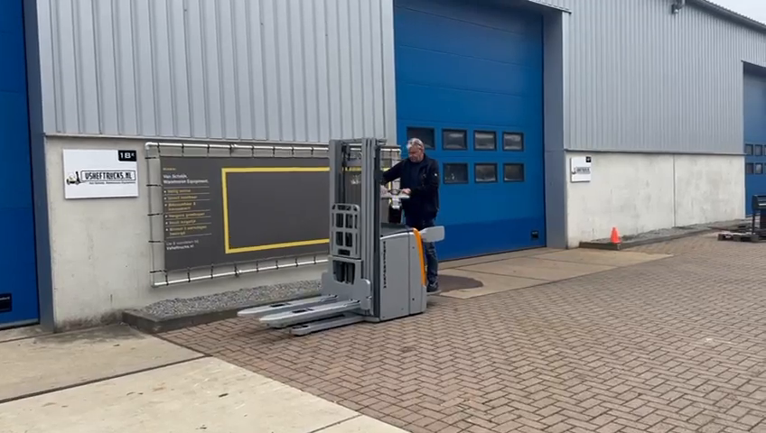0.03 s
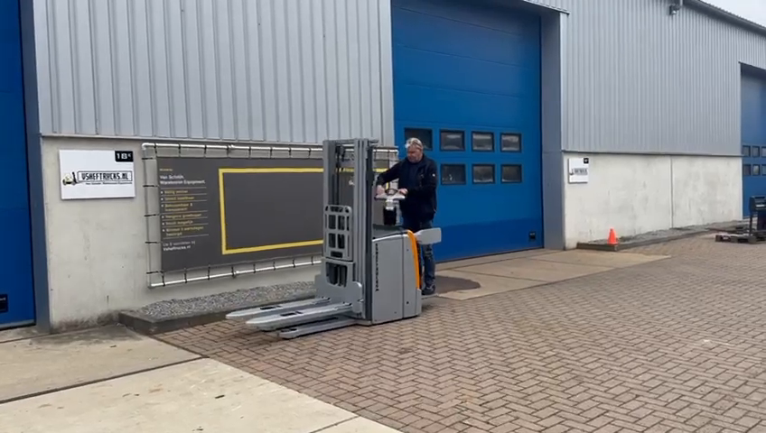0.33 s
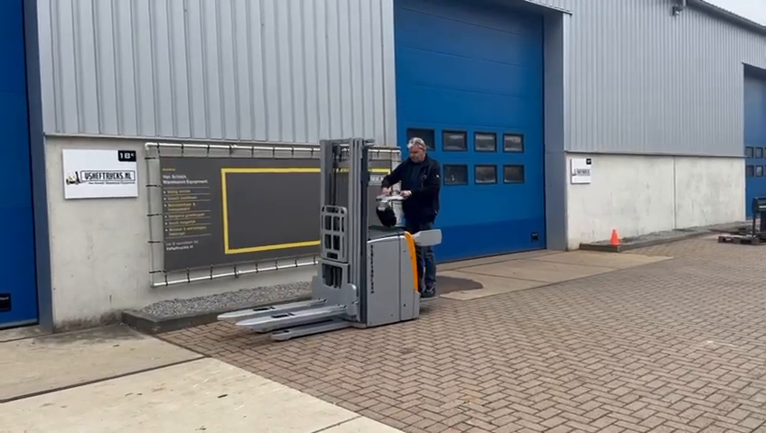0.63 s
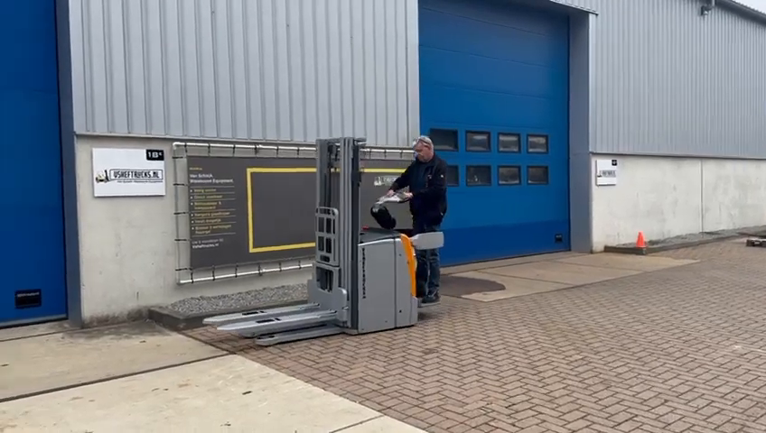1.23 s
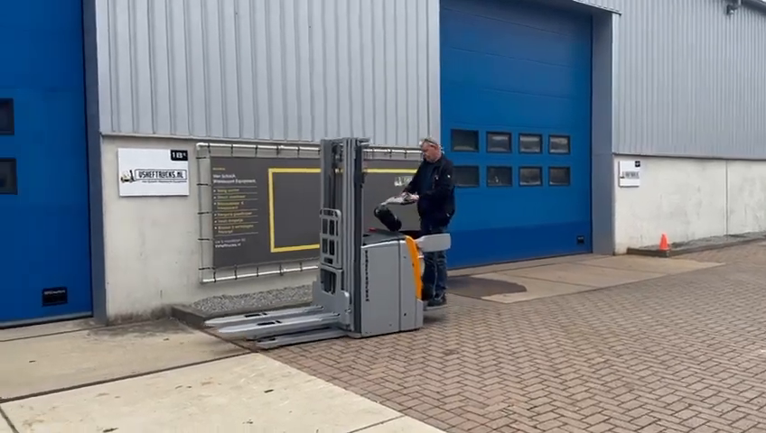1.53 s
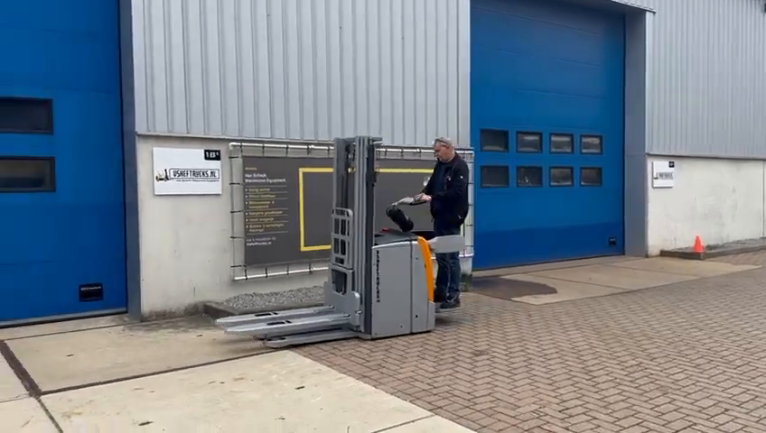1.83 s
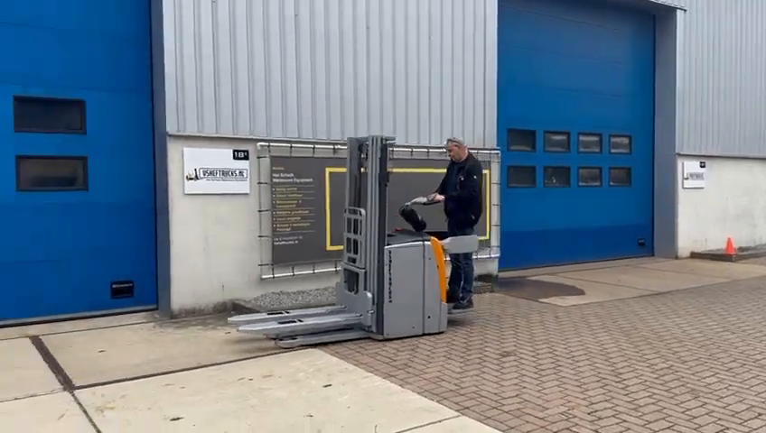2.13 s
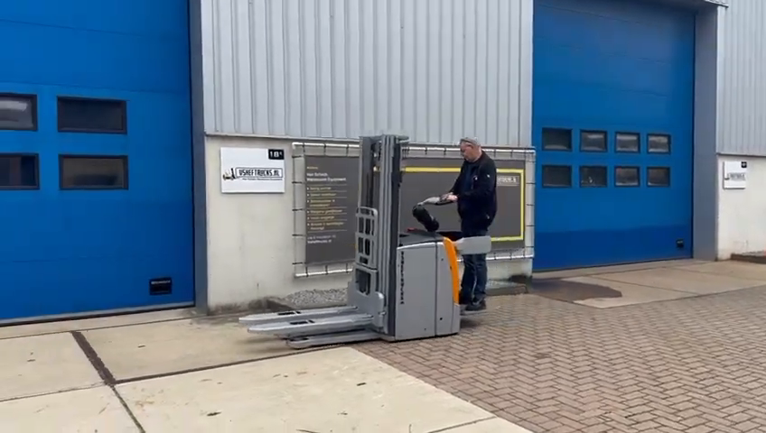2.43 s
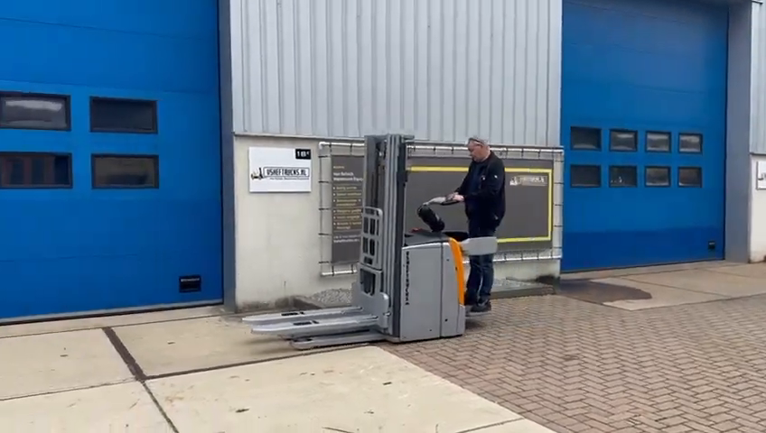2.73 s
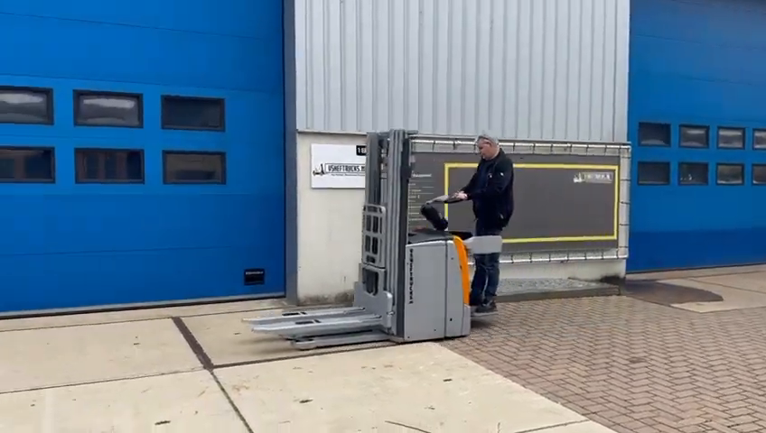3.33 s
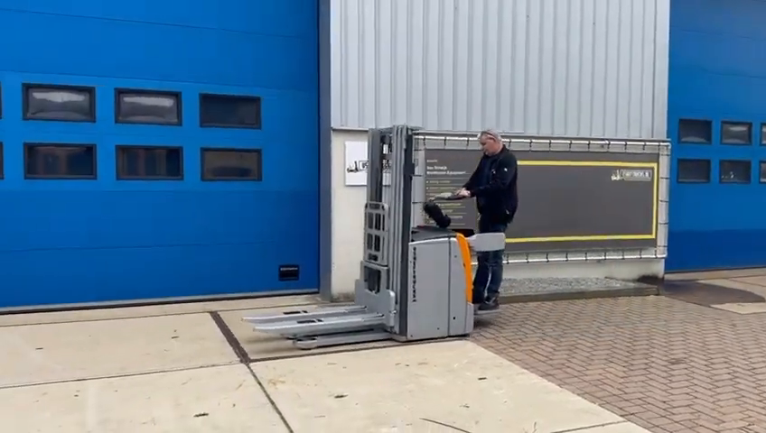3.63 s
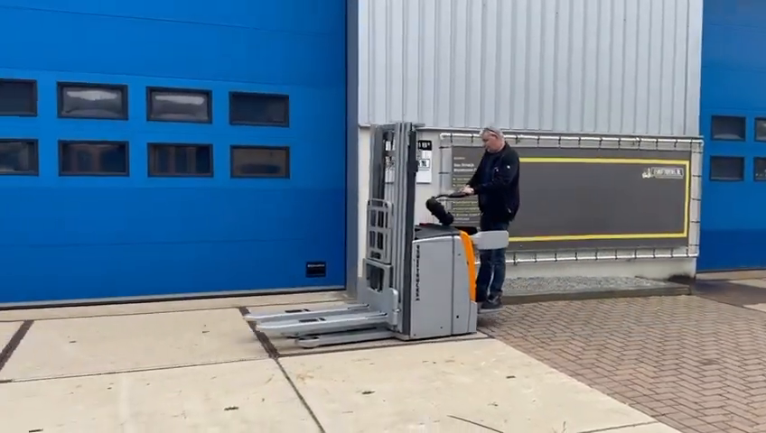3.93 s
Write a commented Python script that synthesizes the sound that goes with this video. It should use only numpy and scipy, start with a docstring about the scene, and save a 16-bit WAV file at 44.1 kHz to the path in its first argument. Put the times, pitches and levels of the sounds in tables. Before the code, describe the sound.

Metal clatter and booming jolts from an electric pallet stacker rolling across bumpy paving.

```python
"""An electric pallet stacker drives over brick paving onto concrete slabs, in front of a steel-clad hall.
At first wind buffets the microphone and the stacker pulls away with a faint squeak. Its rolling noise
grows over a faint drive hum, and each joint jolts it: frame and forks boom, loose mast parts clatter,
and grit crunches under the hard wheels. Near 2 s a run of hard jolts sets the battery cover clanking;
near 3.6 s comes another, as the heavy drive wheel thuds onto a slab."""
import sys
import numpy as np
from scipy import signal
from scipy.fft import rfft, irfft, next_fast_len
from scipy.io import wavfile
from scipy.ndimage import uniform_filter1d

SR = 44100
rng = np.random.default_rng(int(sys.argv[2]) if len(sys.argv) > 2 else 0)


def transcribe(u):
    """Save the signal u as a 16-bit wav file named by the first command-line argument.

    u: samples, shape (n,) or (channels, n), limited to [-1, 1]; the rate is SR.
    q: integer samples, one column per channel.
    """
    v = np.clip(np.atleast_2d(u).T, -1, 1)
    q = np.round(v * 32767).astype(np.int16)
    wavfile.write(sys.argv[1], SR, q)


N = 176400
TIME = np.arange(N) / SR
FFT_SIZE = 2 * next_fast_len((N + SR) // 2)
FREQS = np.maximum(np.arange(FFT_SIZE // 2 + 1) * SR / FFT_SIZE, 1)

# Levels are relative within each table.
# gusts on the microphone: (time [s], level [dB], time constant [s])
GUSTS = [(0, -31.5, 0.14), (.164, -32.5, 0.11), (.27, -28.5, 0.083), (0.468, -24, 0.1),
         (.518, -21.5, 0.033), (.616, -28.5, 0.068), (.78, -37.5, 0.11)]
# spectra of the broadband sources: (frequency [Hz], level [dB])
AIR_SPECTRUM = [(30, 3.5), (200, -5), (600, -8), (1500, -21.5), (4000, -25.5), (7000, -28.5), (11000, -48)]
BUFFET_SPECTRUM = [(20, -15.5), (42, -8.5), (65, 4), (90, -2.5), (140, -13), (220, -22.5), (400, -43.5),
                   (1000, -78)]
TYRE_SPECTRUM = [(25, -47.5), (60, 8.5), (130, 4), (250, 4), (400, -2), (600, -3), (1000, -11), (2000, -11),
                 (4000, -25.5), (7000, -31), (11000, -36.5)]
GRIT_SPECTRUM = [(600, -15), (2000, -1.5), (4000, 6.5), (7000, 2), (8300, 9.5), (9700, 5), (10700, -0.5),
                 (12000, -40)]
CLATTER_SPECTRUM = [(300, -40), (700, 4), (1000, 1), (1900, -3), (2500, -7), (3600, -8), (5200, -19),
                    (7000, -22), (10000, -19.5), (12000, -37)]
PANEL_SPECTRUM = [(25, -46.5), (60, -24), (130, -3.5), (260, 1.5), (400, -6), (560, 1.5), (730, -2.5),
                  (950, -18), (1500, -19.5), (4000, -58.5)]
# partials of the drive hum: (frequency [Hz], level [dB])
HUM_PARTIALS = [(259, -51), (522, -58), (732, -69.5)]
# course of the rolling noise: (time [s], level [dB])
ROLLING_LEVELS = [(0, -54), (.5, -54.5), (.8, -42.5), (1.15, -36.5), (1.32, -45.5), (1.6, -35.5),
                  (2.2, -39.5), (2.5, -39), (2.85, -40.5), (3.4, -34.5), (4, -37)]
# grit crushed under a wheel: (time [s], level [dB], time constant [s])
GRIT_BURSTS = [(0.563, -52, .013), (1.062, -41, .024), (1.513, -46, 0.044), (1.751, -36.5, 0.019),
               (1.901, -21.5, 0.023), (2.045, -32.5, .05), (3.622, -29.5, 0.12)]
# a loose steel pin strikes in the mast: (time [s], level [dB])
PIN_HITS = [(0.424, -51.5), (.787, -45), (.997, -39), (2.713, -37)]
# the battery cover is struck: (time [s], level [dB], pitch [Hz])
COVER_HITS = [(1.835, -16.5, 659), (1.931, -15, 658), (2.033, -16, 658), (2.938, -21.5, 614),
              (3.639, -10.5, 608), (3.682, -11, 539)]
# modes of pin and cover: (ratio to the pitch [1], level [dB], time constant [s])
PIN_MODES = [(1, 0, 0.01)]
COVER_MODES = [(1, -2, 0.0092), (1.27, -12, 0.0084)]
# booms of the forks at the hardest jolts: (time [s], level [dB], time constant [s])
FORK_BOOMS = [(1.832, -16, 0.029), (2.066, -21.5, 0.037), (3.672, -23.5, 0.06)]
# a wheel drops into a joint: (time [s], mast level [dB], frame level [dB], rattle time constant [s])
JOLTS = [(.262, -60, -71, 0.027), (0.312, -48.5, -60, 0.013), (0.42, -51.5, -34, 0.0056),
         (0.544, -45, -35, 0.021), (0.665, -43.5, -35.5, 0.016), (0.786, -47, -32.5, 0.011),
         (0.874, -35.5, -30.5, 0.017), (0.985, -36.5, -28.5, 0.042), (1.059, -37, -28.5, 0.095),
         (1.102, -34, -28, 0.035), (1.186, -40, -32, 0.011), (1.367, -41.5, -34, 0.19),
         (1.414, -33, -23.5, 0.18), (1.475, -30.5, -28.5, 0.079), (1.514, -26, -20.5, 0.025),
         (1.59, -32, -26, 0.2), (1.645, -31.5, -32.5, 0.043), (1.76, -34, -43, 0.075),
         (1.81, -21.5, -18, 0.068), (1.828, -19.5, -18.5, 0.02), (1.869, -22.5, -20, 0.039),
         (1.913, -21, -18, 0.016), (1.932, -22.5, -21, 0.006), (2.027, -18, -16.5, 0.042),
         (2.069, -20.5, -17, 0.074), (2.109, -37, -20.5, 0.07), (2.177, -31, -26, 0.014),
         (2.251, -31.5, -24.5, 0.025), (2.366, -40.5, -25, 0.021), (2.394, -34, -27.5, 0.019),
         (2.503, -45, -45, 0.017), (2.56, -35.5, -28, 0.02), (2.634, -39, -33.5, 0.018),
         (2.709, -36, -28.5, 0.02), (2.859, -39.5, -35, 0.015), (2.924, -35, -31, 0.01),
         (2.939, -31, -24.5, 0.043), (2.983, -32, -25.5, 0.039), (3.018, -31.5, -24.5, 0.056),
         (3.054, -26.5, -20.5, 0.045), (3.108, -33.5, -31, 0.019), (3.169, -39, -46, 0.0098),
         (3.275, -34.5, -27, 0.052), (3.351, -37, -31.5, 0.051), (3.401, -29.5, -23.5, 0.058),
         (3.516, -33, -25.5, 0.03), (3.574, -32, -24.5, 0.1), (3.619, -19, -19.5, 0.058),
         (3.640, -17.5, -15, 0.038), (3.672, -22, -15.5, 0.065), (3.727, -19, -18.5, 0.04),
         (3.758, -24, -17.5, 0.075), (3.835, -25, -20, 0.028), (3.949, -42, -35, 0.015)]
# modes of the mast and of the frame with its forks: (frequency [Hz], level [dB], T60 [s])
MAST_MODES = [(1117, 3, 0.47), (1601, 2, .19), (1891, 8, 0.042), (2100, 2, 0.12), (3284, -3.5, 0.23),
              (4355, -4, .05)]
FRAME_MODES = [(126.9, -6.5, 0.4), (177.6, -17, 0.61), (195.2, -4, 0.65), (232.3, -7.5, 0.38),
               (261.2, -3, 0.17), (456, -6, 0.19), (509, -1.5, 0.24), (541.8, 2, 0.24), (581, -0.5, 0.073),
               (675.5, 1, 0.034), (707.6, 2, 0.086), (742, -2.5, 0.088), (906, -18, 0.22),
               (1003, -9.5, 0.032)]
# reflections off the hall: (delay [s], level [dB])
HALL_ECHOES = [(.019, -19.5), (.034, -16)]
# stereo width: (frequency [Hz], gain of the side signal [dB])
SIDE_GAINS = [(60, -21.5), (200, -24.5), (600, -16), (1100, -13), (2200, -6.5), (4000, -8), (6300, -7),
              (8100, -38), (9500, -12)]
# phase between the microphone ports: (frequency [Hz], phase [rad])
PORT_PHASE = [(30, 0), (1500, 0), (2150, .3), (2580, .7), (3450, .1), (4480, .5), (5700, 0), (6850, .2),
              (7450, 2.2), (8100, 3.1), (8750, 2.7), (9300, .3), (11500, 0)]


def from_db(db):
    """Amplitude ratio of a level in decibels."""
    return 10 ** (np.asarray(db) / 20)


def unit_rms(x):
    """Normalisation to a mean power of 1."""
    return x / np.sqrt(np.mean(x ** 2) + 1e-20)


def over_hz(points):
    """Interpolation of a table on a log-frequency axis."""
    hz, value = np.transpose(points)
    return np.interp(np.log(FREQS), np.log(hz), value)


def colour(x, spectrum):
    """Minimum-phase filtering by the folded cepstrum; white input keeps its power."""
    cepstrum = irfft(np.log(unit_rms(from_db(over_hz(spectrum)))), FFT_SIZE)
    cepstrum[1:FFT_SIZE // 2] *= 2
    cepstrum[FFT_SIZE // 2 + 1:] = 0
    return irfft(rfft(x, FFT_SIZE) * np.exp(rfft(cepstrum)), FFT_SIZE)[:N]


def drift(per_s):
    """Random modulation of unit rms, interpolated between per_s values a second."""
    knots = rng.standard_normal(2000)
    return unit_rms(np.interp(TIME * per_s, np.arange(len(knots)), knots))


def tone(hz):
    """A sinusoid whose phase is the integral of its frequency."""
    return np.sin(2 * np.pi * np.cumsum(hz) / SR)


def contacts(per_s, spread_db):
    """Shot noise: random impulses of uneven size, held near a mean power of 1."""
    sizes = from_db(spread_db * np.minimum(rng.exponential(1, N), 4)) * rng.choice([-1, 1], N)
    clicks = sizes * (rng.random(N) < per_s / SR)
    return clicks / np.sqrt(np.abs(uniform_filter1d(clicks ** 2, size=400)) + 1e-4)


def envelope(age, rise_s, hold_s, decay_s):
    """Linear rise, hold, then the exponential decay of a damped vibration."""
    return np.minimum(age / rise_s, 1) * np.exp(-np.maximum(age - rise_s - hold_s, 0) / decay_s)


def bursts(events, rise_s, hold_s):
    """Incoherent addition: the envelopes of overlapping events sum in power."""
    power = np.zeros(N)
    for start, db, decay_s in events:
        first = int(start * SR)
        age = TIME[:min(N - first, SR // 2)]
        power[first:first + len(age)] += (from_db(db) * envelope(age, rise_s, hold_s, decay_s)) ** 2
    return np.sqrt(power)


def ring(force, modes):
    """Modal superposition: each mode answers the force as a damped resonator."""
    out = 0
    total = np.sqrt(sum(from_db(db) ** 2 for _, db, _ in modes))
    for k, (hz, db, t60) in enumerate(modes):
        radius, angle = from_db(-60 / (t60 * SR)), 2 * np.pi * hz / SR
        gain = from_db(db) / total * np.sqrt(2 * (1 - radius ** 2)) * np.sin(angle)
        feedback = [1, -2 * radius * np.cos(angle), radius ** 2]
        out += signal.lfilter([0, gain * (-1) ** k], feedback, force + 1e-18)
    return out


def struck(hits, modes, rise_s, hold_s, wobble):
    """Free vibration after each hit; a loose seating makes the pitch of the modes unsteady."""
    out, age = np.zeros(N + SR // 8), TIME[:SR // 8]
    for ratio, mode_db, decay_s in modes:
        waver = np.pad(1 + wobble * drift(per_s=250), (0, len(age)), mode="edge")
        shape = envelope(age, rise_s, hold_s, decay_s)
        for start, db, hz in hits:
            span = slice(int(start * SR), int(start * SR) + len(age))
            out[span] += from_db(db + mode_db) * shape * tone(hz * ratio * waver[span])
    return out[:N]


def yard(x, t60_s=1):
    """Reflection: dull echoes off the hall and a diffuse, dying tail join the direct sound."""
    dull = signal.sosfilt(signal.butter(1, 2500, fs=SR, output="sos"), x)
    echoes = sum(from_db(db) * np.interp(TIME - delay, TIME, dull, left=0) for delay, db in HALL_ECHOES)
    tail = rng.standard_normal(SR) * from_db(-60 * TIME[:SR] / t60_s)
    reverberation = signal.fftconvolve(x, tail / np.linalg.norm(tail))[:N]
    return x + echoes + from_db(-12.5) * reverberation


def wind():
    """Turbulence: low gusts buffet the microphone in the first second, over quiet outdoor air."""
    gusts = bursts(GUSTS, rise_s=0.016, hold_s=0.009)
    eddies = colour(rng.standard_normal(N), BUFFET_SPECTRUM)
    eddies /= np.sqrt(uniform_filter1d(eddies ** 2, size=1200))
    air = colour(rng.standard_normal(N), AIR_SPECTRUM)
    return gusts * eddies + from_db(-54) * air


def drive_hum(swell_s=2.2):
    """Rotation tones: the motor's partials waver together and swell as the stacker pulls away."""
    speed = 1 + 0.0036 * drift(per_s=25)
    hum = sum(from_db(db + 3 * drift(per_s=20)) * tone(hz * speed) for hz, db in HUM_PARTIALS)
    return hum * np.minimum(TIME / swell_s, 1) ** 2


def squeak(peak_s=0.272, half_width_s=0.036, hz=2030, sag_hz_per_s=1100):
    """Frequency and amplitude modulation roughen one faint, falling squeak."""
    age = TIME - peak_s
    pitch = hz - sag_hz_per_s * age + 55 * drift(per_s=310)
    level = from_db(-57 + 3.2 * drift(per_s=150))
    return level * np.exp(-(age / half_width_s) ** 2) * tone(pitch)


def wheels(hiss_above_hz=700, full_speed_s=2.1):
    """Roughness excitation: hard tyres rumble, hiss more with speed and keep the frame trembling."""
    level = from_db(-1.5 + np.interp(TIME, *np.transpose(ROLLING_LEVELS)) + 2.3 * drift(per_s=25))
    tremble = ring(level * contacts(per_s=610, spread_db=3.5), FRAME_MODES)
    tyres = colour(level * contacts(per_s=2500, spread_db=3.5), TYRE_SPECTRUM)
    rumble = signal.sosfiltfilt(signal.butter(2, hiss_above_hz, fs=SR, output="sos"), tyres)
    hiss = from_db(np.interp(TIME, [0, full_speed_s], [-5.5, 0])) * (tyres - rumble)
    return rumble + hiss + from_db(-4.5) * tremble


def grit():
    """Brittle fracture: sand grains crack under the wheels in short, bright bursts."""
    load = bursts(GRIT_BURSTS, rise_s=0.0066, hold_s=0.013)
    return from_db(-2.5) * colour(load * contacts(per_s=5000, spread_db=2.0), GRIT_SPECTRUM)


def pin(hz=1930):
    """Impact excitation: a loose steel pin clinks in one bright mode on some of the knocks."""
    hits = [(start, db, hz) for start, db in PIN_HITS]
    return struck(hits, PIN_MODES, rise_s=0.0035, hold_s=0.0054, wobble=0.011)


def thud(start_s=3.65, db=-29.5, decay_s=0.11, band_hz=(109 / 1.4, 109 * 1.31)):
    """Impact of a large mass: the battery's weight lands on the drive wheel with a deep, short rumble."""
    rumble = signal.sosfilt(signal.butter(2, band_hz, "band", fs=SR, output="sos"), rng.standard_normal(N))
    return unit_rms(rumble) * bursts([(start_s, db, decay_s)], rise_s=0.039, hold_s=0.062)


def forks(hz=256.7):
    """Resonance: the hollow forks swing in one low, unsteady mode after a hard drop."""
    pitch = hz * (1 + 0.0363 * drift(per_s=90))
    swing = bursts(FORK_BOOMS, rise_s=0.0051, hold_s=0.039) * from_db(1.6 * drift(per_s=56))
    return swing * tone(pitch)


def battery_cover():
    """Strong damping: the hollow cover, struck at the deeper joints, gives separate short clanks."""
    return struck(COVER_HITS, COVER_MODES, rise_s=0.0033, hold_s=0.011, wobble=0.037)


def pings(shake, per_s=900, decay_s=0.0068, spread_db=1.5):
    """Damped oscillation: loose parts touch as the mast shakes, each touch ringing at its own pitch."""
    out, age = np.zeros(N + SR // 20), TIME[:SR // 20]
    candidates = rng.random((8000, 4))
    for when, pitch, size, chance in candidates:
        if chance < per_s * N / SR / len(candidates):
            first, hz = int(when * N), 600 + 8400 * pitch
            strength = shake[first] * from_db(spread_db * (4 * size - 3))
            out[first:first + len(age)] += strength * np.exp(-age / decay_s) * np.sin(2 * np.pi * hz * age)
    return out[:N] * 2 / np.sqrt(per_s * decay_s)


def mast():
    """Repeated collision: jolts set chain, rollers and guard clattering, steel on steel."""
    jolts = [(start, db, decay_s) for start, db, _, decay_s in JOLTS]
    shake = bursts(jolts, rise_s=0.0011, hold_s=0.016)
    knocks = shake * contacts(per_s=700, spread_db=1.5)
    chatter = from_db(-3.5 + 1.7 * drift(per_s=45)) * shake * rng.standard_normal(N)
    clatter = colour(0.26 * knocks + chatter + from_db(-5) * pings(shake), CLATTER_SPECTRUM)
    return from_db(-14.5) * ring(knocks, MAST_MODES) + from_db(-4.5) * clatter


def frame(linger=1.06):
    """Forced vibration: jolts make forks and battery box bounce on the frame, which booms."""
    jolts = [(start, db, linger * decay_s) for start, _, db, decay_s in JOLTS]
    shake = bursts(jolts, rise_s=0.0072, hold_s=0.013)
    boom = ring(shake * contacts(per_s=900, spread_db=1.5), FRAME_MODES)
    panels = colour(shake * contacts(per_s=900, spread_db=5.5), PANEL_SPECTRUM)
    return from_db(-5.5) * boom + from_db(-6.5) * panels


def scene():
    """Decorrelation: the stacker is straight ahead; sound scattered from the sides widens the treble."""
    knocks = frame() + battery_cover() + pin() + forks() + thud() + mast()
    mid = yard(knocks + grit() + wheels() + drive_hum() + squeak()) + wind()
    scattered = yard(frame() + battery_cover() + pin() + mast() + from_db(3) * grit() + wheels()) + wind()
    side = irfft(rfft(scattered, FFT_SIZE) * from_db(over_hz(SIDE_GAINS)), FFT_SIZE)[:N]
    return np.array([mid + side, mid - side])


def record(dry):
    """Phase shift between the two microphone ports in the treble, then a steep low-pass at 11.6 kHz."""
    phase_shift = np.exp(0.5j * over_hz(PORT_PHASE) * np.array([[1], [-1]]))
    ports = irfft(rfft(dry, FFT_SIZE) * phase_shift, FFT_SIZE)[:, :N]
    return signal.sosfilt(signal.ellip(10, 0.3, 80, 11600, fs=SR, output="sos"), ports)


dry = scene()
out = record(dry)
transcribe(out)
```